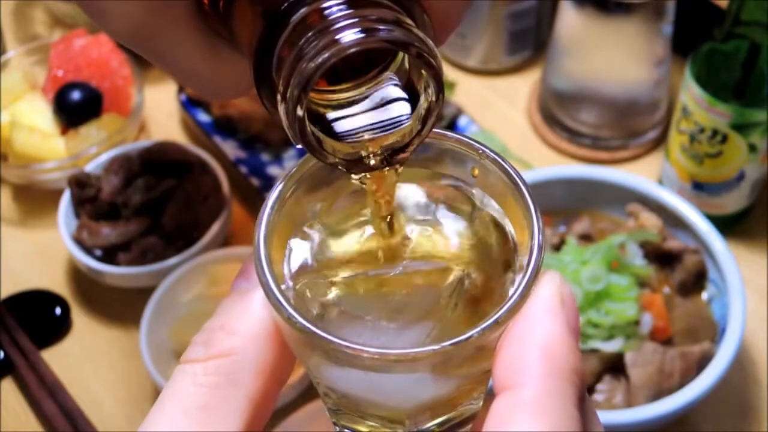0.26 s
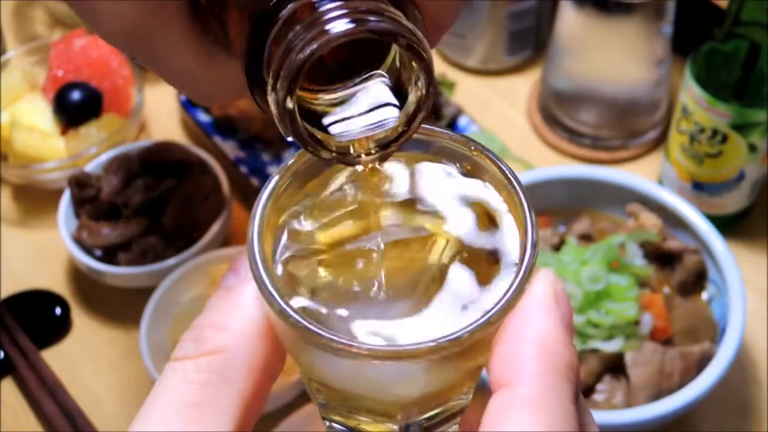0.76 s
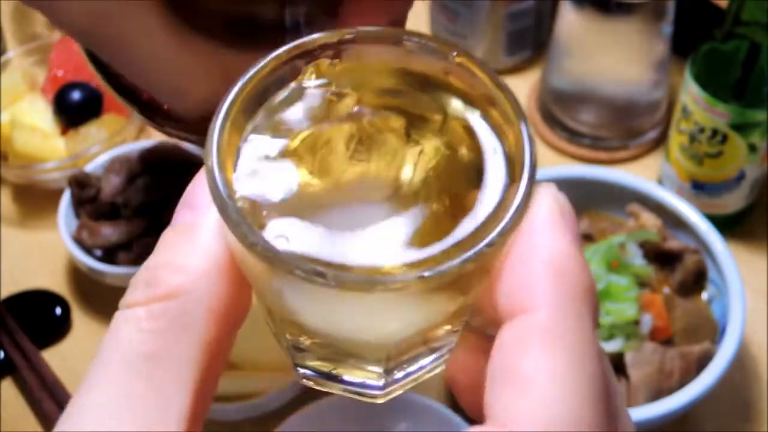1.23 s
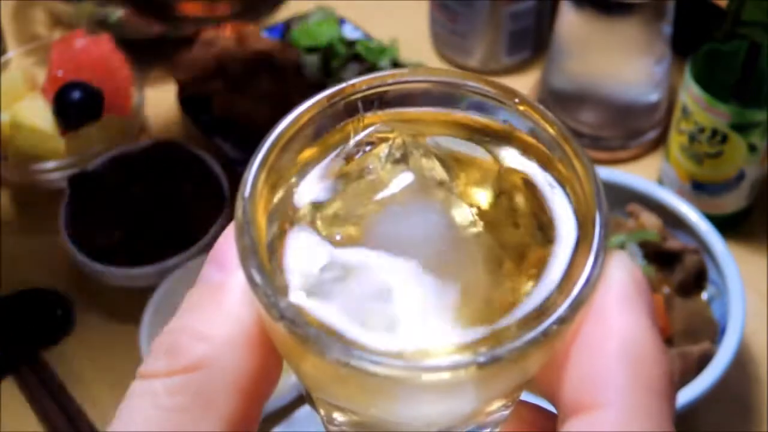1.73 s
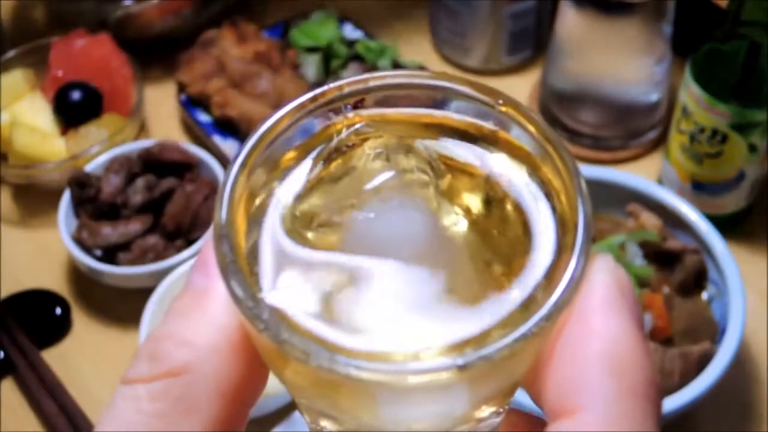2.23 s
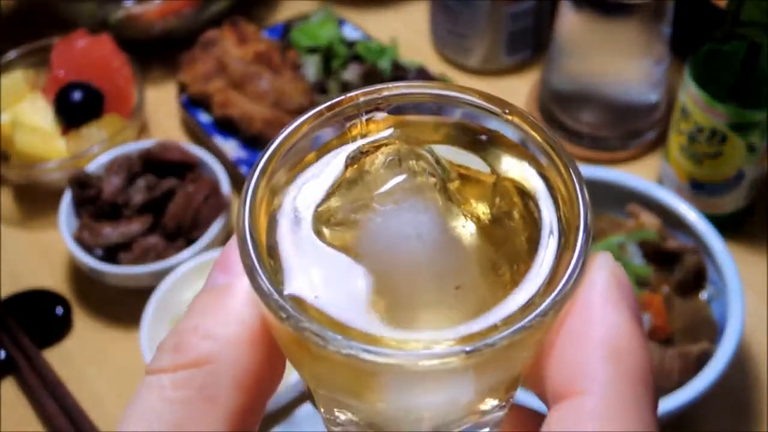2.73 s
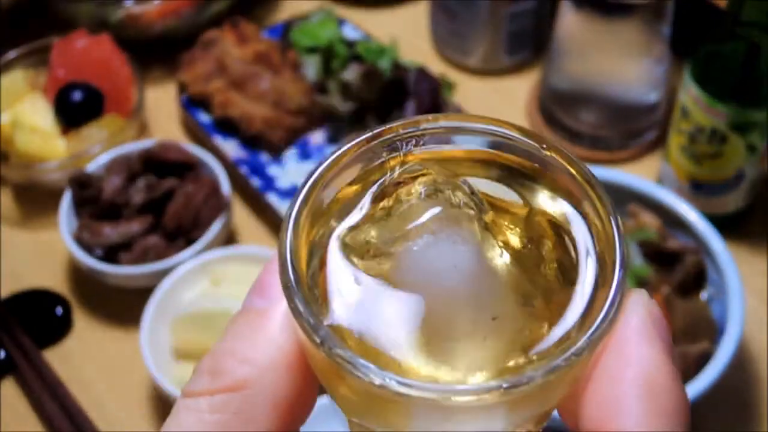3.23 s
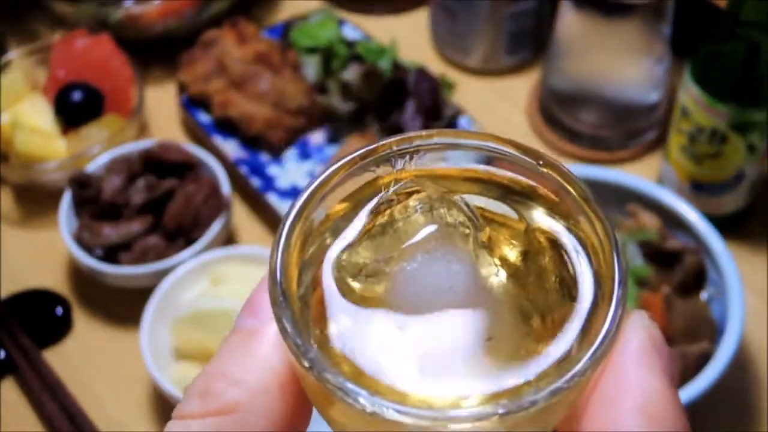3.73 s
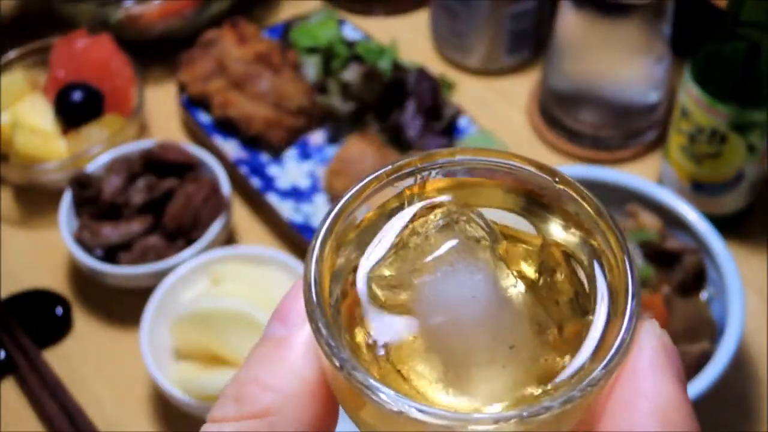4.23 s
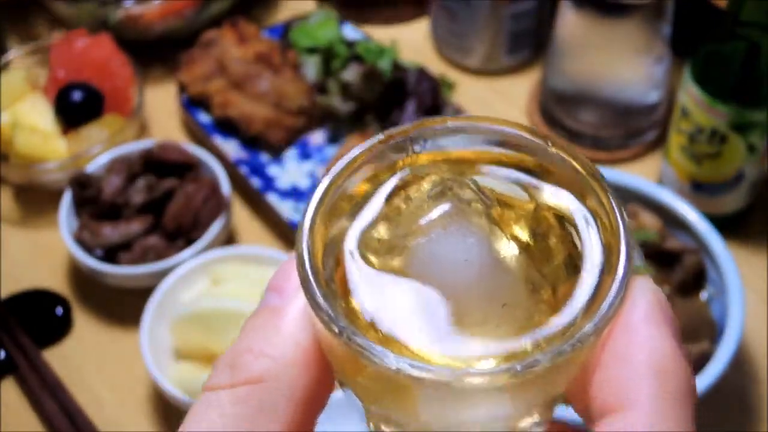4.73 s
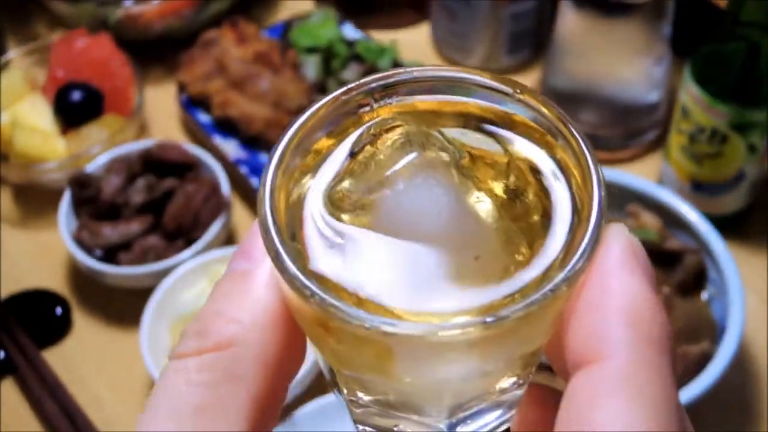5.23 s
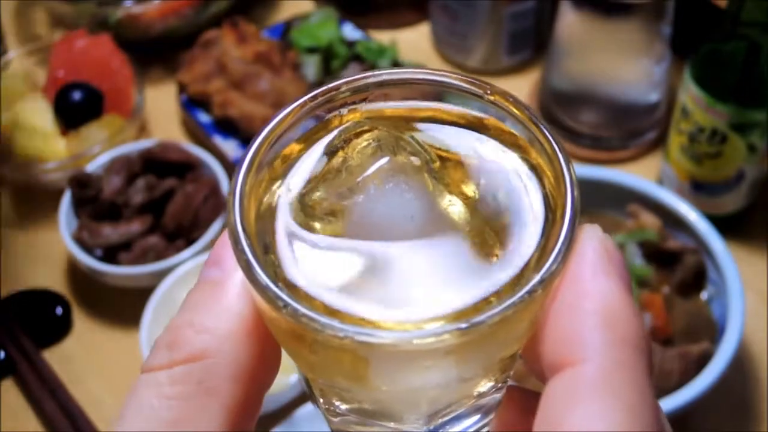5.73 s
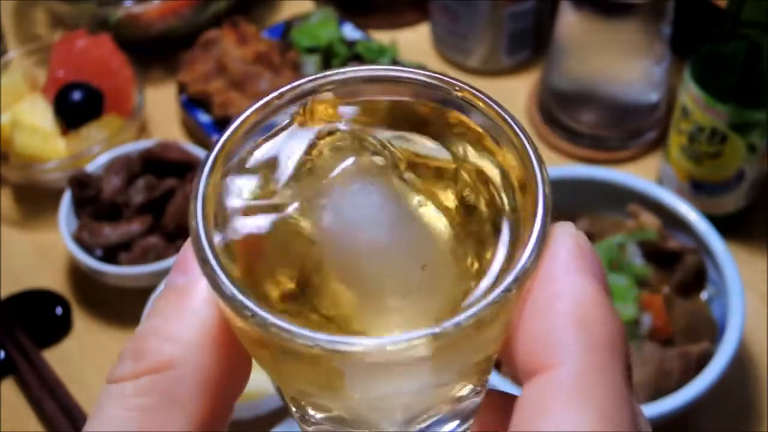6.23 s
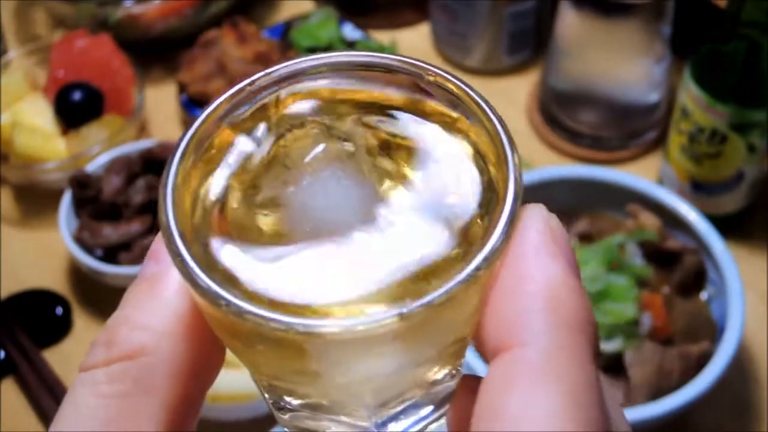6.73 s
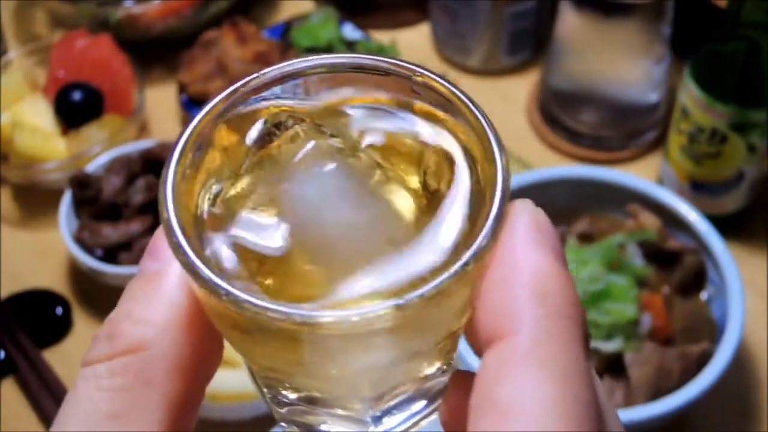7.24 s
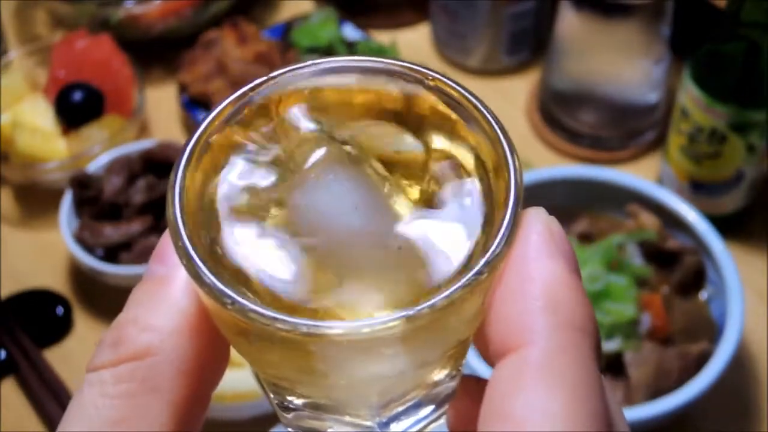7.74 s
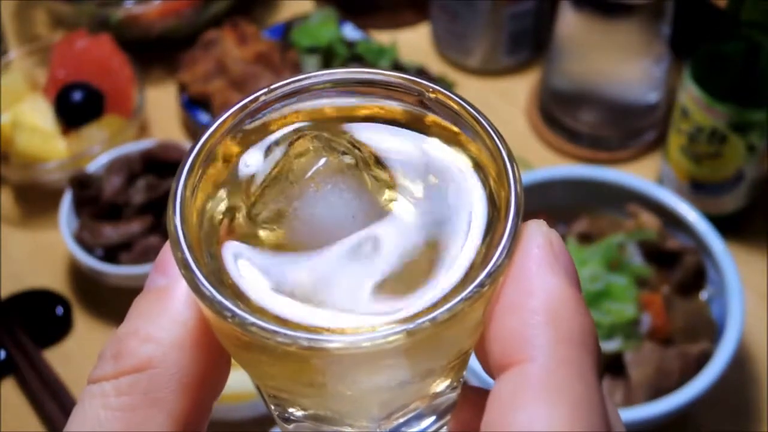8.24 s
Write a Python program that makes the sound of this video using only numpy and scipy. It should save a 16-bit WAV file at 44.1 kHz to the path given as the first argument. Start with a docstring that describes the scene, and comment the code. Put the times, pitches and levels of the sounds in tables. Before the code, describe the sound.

Hollow ringing glugs, a rapid burst of gulping pops, a loud bottle thump on wood, short scrapes and glassy chatter, then tiny ice clinks.

```python
"""Liquor poured over ice

A quiet room, a stereo microphone close to a small glass of ice: liquor glugs from a bottle neck as ringing air.
The bottle is tipped back and gulps air in short pops, amid small bubbles and a rising gurgle. It is set down on a
wooden table (clicks into modes), slid (friction grains) and rocked (bright bursts); ice ticks on the glass (high
rings). Behind it lie the hiss of air and preamplifier, swells of low rumble and the room's echoes."""
import sys
import numpy as np
from scipy import signal
from scipy.fft import rfft, irfft
from scipy.io import wavfile
from scipy.ndimage import uniform_filter1d, minimum_filter1d

SR = 44100
rng = np.random.default_rng(int(sys.argv[2]) if len(sys.argv) > 2 else 0)


def pcm_store(signal):
    """Save signal as 16-bit PCM."""
    levels = np.round(np.clip(np.atleast_2d(signal), -1, 1) * 32767)
    wavfile.write(sys.argv[1], SR, levels.astype(np.int16).T)


def undo_db(level):
    """Turn decibels back into plain size, where 20 dB means ten times bigger."""
    steps = np.asarray(level, float) / 20
    return 10 ** steps


N = 373527


def rms_one(x):
    """Scale to unit rms."""
    return x / np.sqrt(np.mean(x ** 2) + 1e-20)


def at_hz(points, hz):
    """Read a spectrum on a log-frequency axis."""
    point_hz, value = np.transpose(points)
    return np.interp(np.log(hz), np.log(point_hz), value)


def butter(x, order, hz, kind="low"):
    """Pass a sound through a Butterworth filter."""
    return signal.sosfilt(signal.butter(order, hz, kind, fs=SR, output="sos"), x)


def coloured(x, gain):
    """Filter by a gain given as a function of frequency."""
    hz = np.maximum(np.fft.rfftfreq(N, 1 / SR), 1)
    return irfft(rfft(x) * gain(hz), N)


def clicks(times, heights):
    """One sample of the given height at each time."""
    out = np.full(N, 1e-18)
    np.add.at(out, (np.asarray(times) * SR).astype(int), heights)
    return out


def ring(drive, hz, t60):
    """A two-pole resonance: a unit click sets a dying sine of height 1 ringing."""
    r = undo_db(-60 / (t60 * SR))
    w = 2 * np.pi * hz / SR
    return signal.lfilter([0, np.sin(w)], [1, -2 * r * np.cos(w), r * r], drive)


def bursts(times, levels_db, t60, noise=None):
    """Noise, white unless given, that starts at once and dies away."""
    out = np.zeros(N + SR)
    age = np.arange(SR // 3) / SR
    for s, db in zip(times, levels_db):
        add(out, s, undo_db(db - 60 * age / t60))
    return out[:N] * (rng.standard_normal(N) if noise is None else noise)


def swell(top_s, db, rise_db_per_s, fall_db_per_s):
    """Gain that climbs to a top and sinks again, straight in dB."""
    late = np.arange(N) / SR - top_s
    return undo_db(db + np.where(late < 0, rise_db_per_s, -fall_db_per_s) * late)


def add(out, s, wave):
    """Mix a wave in at a time."""
    start = int(s * SR)
    out[start:start + len(wave)] += wave


# air and preamplifier hiss: f/Hz, level/dB per Hz (relative)
ROOM_TONE = [(12, -5), (20, 1), (66, -6.5), (135, -6.5), (205, -9), (398, -10.5), (555, -13.5), (620, -12),
             (674, -12), (1270, -16.5), (1880, -20), (6530, -25), (10800, -26), (13800, -24.5),
             (15000, -50)]
# how alike the two microphone sides are: f/Hz, likeness (0 to 1)
LIKENESS = [(60, 0.77), (180, 0.4), (540, 0.4), (1620, 0.17), (4860, 0.048), (14600, -0.0)]


def room_tone():
    """Steady air and preamplifier hiss, alike on both sides only in the bass."""
    def colour(hz):
        return undo_db(at_hz(ROOM_TONE, hz))

    def alike(hz):
        return np.clip(at_hz(LIKENESS, hz), 0, .99)

    mid = coloured(rng.standard_normal(N), lambda hz: colour(hz) * np.sqrt(1 + alike(hz)))
    side = coloured(rng.standard_normal(N), lambda hz: colour(hz) * np.sqrt(1 - alike(hz)))
    mid_rms = np.sqrt(np.mean(mid ** 2))
    return undo_db(-52) * np.array([mid + side, mid - side]) / mid_rms


# low rumble carried through hand and table: top t/s, level/dB, rise/dB per s, fall/dB per s
RUMBLE = [(.136, -54, 77, 19), (.548, -54.5, 70, 140), (4.3, -58, 28, 15)]


def rumble():
    """Narrow low noise in swells."""
    level = np.max([swell(*row) for row in RUMBLE], axis=0)
    return level * rms_one(butter(rng.standard_normal(N), 2, [60, 130], "band"))


# the room's diffuse answer: f/Hz, level/dB, t60/s
ROOM = [(152, -15, 0.36), (380, -24, 0.16), (950, -17.5, 0.31), (2500, -27.5, 0.34), (6000, -24, 0.4),
        (11000, -48, 0.24)]


def room(x):
    """Dense echoes: noise dying at its own rate in each band, partly shared by both sides."""
    age = np.arange(SR // 3) / SR
    answer = 0
    for hz, db, t60 in ROOM:
        tail = butter(rng.standard_normal((3, len(age))), 1, [hz / 1.3, hz * 1.5], "band")
        tail = tail * undo_db(-60 * age / t60) * np.minimum(1, age / 0.018)
        # wider bands hold more energy
        answer = answer + undo_db(db) * tail * np.sqrt(3 * hz / 11000 / np.sum(tail ** 2))
    shared, own = answer[0], answer[1:]
    return signal.fftconvolve(x[None], shared + 0.16 * own, axes=1)[:, :N]


def breadth(x, db, hz):
    """A wide body sends its treble to the two microphones by different short paths."""
    paths = rng.standard_normal(200) * np.exp(-np.arange(200) / 60)
    side = signal.lfilter(paths / np.linalg.norm(paths), 1, x)
    return undo_db(db) * butter(side, 1, hz, "high") * [[1], [-1]]


# bands of the bottle wall: f/Hz, width/Hz, level/dB
BOTTLE = [(2386, 59, -0.5), (3250, 24, -3), (4170, 130, -9), (5270, 120, -10), (6400, 100, -3),
          (8750, 60, -23), (10200, 370, -10)]


def bottle_glass(drive):
    """The bottle wall lifts a few narrow bands out of what shakes it."""
    out = 0
    for hz, width, db in BOTTLE:
        r = np.exp(-np.pi * width / SR)
        poles = [1, -2 * r * np.cos(2 * np.pi * hz / SR), r * r]
        out = out + undo_db(db) * signal.lfilter([(1 - r * r) / 2, 0, (r * r - 1) / 2], poles, drive)
    return out


# glass singing under friction: t/s, length/s, f/Hz, level/dB
SQUEAKS = [(4.3, 0.6, 6400, -68), (4.531, 0.2, 3250, -64), (6.637, 0.071, 8750, -49)]


def squeaks():
    """Noise in one narrow band, swelling and fading."""
    out = np.zeros(N)
    for s, length, hz, db in SQUEAKS:
        tone = rms_one(ring(rng.standard_normal(SR), hz, 0.068))[-int(length * SR):]
        add(out, s, undo_db(db) * tone * np.sqrt(np.hanning(len(tone))))
    return out


# colour of the friction: f/Hz, level/dB per Hz (relative)
RUB_COLOUR = [(88, -33), (150, 9.5), (728, 2), (818, 6), (11200, 4.5), (14200, 9.5), (15000, -31)]
# bottle base rubbing over wood: full-strength t/s, level/dB, rise/dB per s, fall/dB per s, added lows/dB
STROKES = [(3.817, -35.5, 203, 900, 12), (3.775, -62, 300, 900, 2), (3.835, -53.5, 900, 92, 15.5),
           (4.308, -56, 1700, 27, 12.5), (4.74, -56, 161, 76, 11), (4.844, -57, 1502, 260, 9),
           (5.228, -47.5, 1500, 200, 9.5), (6.639, -35, 2500, 191, 2.5), (6.788, -47, 800, 167, 11.5)]


def rubbing():
    """Dense friction grains of uneven size; wood carries the lows, the bottle wall rings along."""
    grains = rng.standard_normal(N) * undo_db(3.5 * np.minimum(rng.exponential(1, N), 4))
    grains = rms_one(coloured(grains, lambda hz: undo_db(at_hz(RUB_COLOUR, hz))))
    low = butter(grains, 2, 2000)
    levels = [swell(*row[:-1]) for row in STROKES]
    level = sum(levels)
    low_level = sum(gain * undo_db(row[-1]) for gain, row in zip(levels, STROKES))
    wall = bottle_glass(level * undo_db(3) * grains)
    return level * (grains - low) + low_level * low + wall


# bottle glass chattering on the table: t/s, level/dB (relative)
CHATTER = [(3.899, -40), (3.962, -38), (4.3096, -34.5), (4.743, -33.5), (4.769, -37), (4.784, -33),
           (4.844, -25.5), (4.861, -32.5), (5.1714, -38), (5.2298, -26), (5.252, -27)]


def chatter():
    """Short bright bursts as the base rocks, with the bottle wall ringing along."""
    s, db = np.transpose(CHATTER)
    bright = butter(bursts(s, db - 9.5, t60=0.031), 2, 2200, "high")
    return bright + undo_db(13.0) * bottle_glass(bright)


# colour of dishes rattling on the table: f/Hz, level/dB per Hz (relative)
RATTLE = [(60, -3), (150, -0.5), (400, 2), (1000, -1), (2000, -13.5), (4000, -25), (8000, -34),
          (15000, -34)]


def knocks(rows, modes, share_db, crack_db, crack_t60, rattle_db, rattle_t60):
    """Each contact is a low-passed click into the modes, plus a short crack; dishes on the table rattle on."""
    s, db, bright_hz = np.transpose(rows)
    dishes = rms_one(coloured(rng.standard_normal(N), lambda hz: undo_db(at_hz(RATTLE, hz))))
    rattle = bursts(s + 0.001, db + rattle_db, rattle_t60, dishes)
    drive = 0
    for at_s, blow_db, hz in rows:
        r = np.exp(-2 * np.pi * hz / SR)
        click = clicks([at_s], undo_db(blow_db + share_db))
        drive = drive + signal.lfilter([(1 - r) ** 2], [1, -2 * r, r * r], click)
    # a harder, brighter contact cracks louder: 13 dB per octave
    crack = bursts(s, db + crack_db + 13 * np.log2(bright_hz / 1000), crack_t60)
    body = 0
    for k, (hz, level_db, t60) in enumerate(modes):
        # neighbouring bending shapes of the top radiate with opposite sign,
        # except the pair that carries the thump
        sign = 1 if 350 < hz < 660 else (-1) ** k
        body = body + sign * undo_db(level_db) * ring(drive, hz, t60)
    return signal.lfilter([1 - .6], [1, -.6], crack) + rattle + body


# bottle base on the table, tilted on its edge or set down flat: t/s, level/dB (relative), brightness f/Hz
LIGHT_KNOCKS = [(3.239, -30, 500), (3.2415, -13, 840), (3.495, -50, 900), (3.7165, -9.5, 580),
                (4.308, -43, 1300), (5.318, -28, 250), (6.41, -40, 300), (6.612, -56, 1500)]
HEAVY_KNOCKS = [(3.5352, 11, 790), (3.5379, 6, 3120), (3.5442, 3, 910), (3.782, -8.5, 2500),
                (3.788, -15, 1500), (3.794, -6, 1970), (3.802, -6, 1160)]
# what the light and the heavy contacts set ringing: f/Hz, level/dB, t60/s
EDGE_MODES = [(143, -10, 0.13), (200, -17, 0.23), (300, -7.5, 0.05), (500, 0, 0.014), (624, 0.0, 0.072),
              (1070, -17.5, 0.13), (1550, -30, .05), (2840, -10.5, 0.24), (4330, -30, .06)]
TABLE_MODES = [(130, -7, 0.057), (186, -15.5, 0.17), (320, -16.5, 0.13), (387, -1.5, 0.1),
               (526, 1.5, 0.046), (700, -4, 0.048), (805, -6, 0.035), (955, -4, 0.061), (1275, -4, 0.023),
               (1650, 0.5, 0.031), (1963, -5.5, 0.037), (2374, -3.5, 0.03), (2780, -5.5, 0.0235),
               (4000, -5, 0.028)]


def table():
    """Light and heavy contacts, each driving its own set of modes."""
    light = knocks(LIGHT_KNOCKS, EDGE_MODES, share_db=-2.5, crack_db=-14, crack_t60=0.077,
                   rattle_db=-25.0, rattle_t60=0.22)
    heavy = knocks(HEAVY_KNOCKS, TABLE_MODES, share_db=-5.5, crack_db=-28.0, crack_t60=0.046,
                   rattle_db=-24.5, rattle_t60=0.2)
    return light + heavy


# ice touching the wall of the glass: t/s, level/dB (relative), edge level/dB added to it
ICE = [(6.4118, -37.5, -4), (6.4931, -27.5, -6), (6.5124, -39, -7), (7.0594, -46, -5), (7.1162, -46, -1),
       (7.2838, -38, -9), (7.327, -43.5, 4.5), (7.42, -49, 8), (7.447, -46, -2), (7.5173, -31, -3.5),
       (7.5336, -33, -13), (7.5444, -42, -8), (7.667, -40, -4), (7.7375, -25, -15), (7.75, -37, -12),
       (7.9447, -35, -17), (7.965, -30, -10), (8.1673, -42, -6)]
# ring of the full glass: f/Hz, level/dB (relative), t60/s
GLASS = [(6880, -1.5, 0.025), (6700, -23, 0.018), (7570, -12, 0.0092), (13700, -12, .015)]


def ice():
    """A sharp edge and the short high ring of the full glass."""
    # while the glass is swirled the ice also ticks faintly at random
    swirl_from_s, swirl_to_s = 6.5, 8.3
    faint = [(swirl_from_s + (swirl_to_s - swirl_from_s) * when, -51 - 5 * soft, -5)
             for when, soft in rng.random((8, 2))]
    s, db, edge_db = np.transpose(list(ICE) + faint)
    # every touch excites the rings unevenly
    strength = undo_db(2.5 * rng.standard_normal((len(s), len(GLASS))))
    rings = 0
    for k, (hz, level_db, t60) in enumerate(GLASS):
        rings = rings + ring(clicks(s, undo_db(db + level_db - 6.5) * strength[:, k]), hz, t60)
    edges = bursts(s, db + edge_db, t60=.008)
    return rings + butter(edges, 2, 5500, "high")


def air_ring(db, hz, t60, swell_s):
    """Trapped air swells quickly and rings out on one pitch."""
    age = np.arange(int(t60 * SR)) / SR
    onset = (1 - np.exp(-age / swell_s)) ** 2
    return -onset * undo_db(db - 60 * age / t60) * np.sin(2 * np.pi * hz * age)


def gliding(pitch_hz, level_db):
    """A tone on a moving pitch with soft ends."""
    part = np.linspace(0, 1, len(pitch_hz))
    ends = np.minimum(1, 12 * np.minimum(part, 1 - part))
    return ends * undo_db(level_db) * np.sin(2 * np.pi * np.cumsum(pitch_hz) / SR)


def pocket(length, hz, rise, db, fade_db, bend):
    """A shrinking pocket of air climbs in pitch and fades; bend above 1 makes it climb ever faster."""
    part = np.linspace(0, 1, int(length * SR))
    return gliding(hz * rise ** (part ** bend), db - fade_db * part)


# small bubbles and droplets ringing, most of them around the gulps: t/s, level/dB, f/Hz, t60/s
BUBBLES = [(1.198, -48, 1590, 0.076), (1.2202, -36, 200, 0.019), (1.222, -21.5, 310, .025),
           (1.232, -37, 440, 0.068), (1.223, -23.5, 2520, 0.01), (1.2223, -15.5, 1298, 0.054),
           (1.226, -32, 960, .07), (1.318, -43, 9050, 0.037), (1.3187, -13.5, 666, 0.031),
           (1.321, -31.5, 1050, .09), (1.385, -27, 3640, 0.016), (1.385, -28, 5600, 0.014),
           (1.385, -34.5, 8340, 0.015), (1.387, -20.5, 935, .1), (1.387, -51, 2000, 0.11),
           (1.457, -35.5, 912, 0.15), (1.459, -38, 380, 0.095), (1.461, -39, 1920, 0.18),
           (1.578, -41, 895, 0.12), (1.619, -37, 4600, 0.014), (1.619, -43, 3600, .022),
           (1.62, -42.5, 11000, .038), (2.095, -40.5, 2090, .016), (4.396, -37, 4540, 0.019)]
# tiny pockets that chirp upward as they burst: t/s, first f/Hz, level/dB
CHIRPS = [(1.225, 2720, -35.5), (1.2225, 7300, -36), (1.2225, 9400, -33.5)]


def bubbles():
    """Small pockets of air: some ring on one pitch, some chirp upward."""
    out = np.zeros(N)
    for s, db, hz, t60 in BUBBLES:
        add(out, s, air_ring(db, hz, t60, swell_s=0.01 * t60))
    for s, hz, db in CHIRPS:
        add(out, s, pocket(0.0088, hz, rise=1.35, db=db, fade_db=9.5, bend=0.85))
    return out


# the last pocket in the neck: t/s, f/Hz, level/dB
GURGLE = [(1.388, 289, -39), (1.42, 320, -47), (1.44, 436, -45.5), (1.454, 700, -26.5), (1.459, 1550, -31),
          (1.466, 2280, -40), (1.478, 3530, -46)]


def gurgle():
    """The last pocket gurgles up the neck ever faster, one tone gliding upward."""
    out = np.zeros(N)
    s, hz, db = np.transpose(GURGLE)
    now = np.arange(s[0], s[-1], 1 / SR)
    pitch_hz = np.exp(np.interp(now, s, np.log(hz)))
    add(out, s[0], gliding(pitch_hz, np.interp(now, s, db)))
    return out


# big gulps of air as the bottle is tipped back: t/s, level/dB, f/Hz
GULPS = [(1.2212, -4.5, 724), (1.3189, -11, 950), (1.3847, -8, 857), (1.4565, -19.5, 730)]


def gulps():
    """Air pops into the bottle, each gulp a short ring of trapped air."""
    out = np.zeros(N)
    for s, db, hz in GULPS:
        add(out, s, air_ring(db, hz, t60=0.011, swell_s=0.00047))
    return out


# glugs passing the neck: t/s, level/dB, climb/s
GLUGS = [(.1024, -22.5, .027), (0.3141, -25, .0225), (0.5357, -25, .007), (.79, -48.5, .007)]


def glugs():
    """A glug rings the neck; its pocket shrinks, climbs to near the neck's pitch and rings it again."""
    out = np.zeros(N)
    neck_swell_s, climb_from_hz, climb_to_hz = 0.00031, 600, 1150
    for s, db, climb_s in GLUGS:
        add(out, s, air_ring(db, 1205, t60=0.069, swell_s=neck_swell_s))
        add(out, s, air_ring(db - 19.5, 3600, t60=0.015, swell_s=neck_swell_s))   # overtone
        add(out, s, pocket(climb_s, climb_from_hz, climb_to_hz / climb_from_hz, db - 18,
                           fade_db=2.5, bend=2.4))
        # the longer the climb, the stronger the second ring: 400 dB per s
        again_db = db - 14.5 + 400 * climb_s
        add(out, s + climb_s, air_ring(again_db, 1167, t60=0.066, swell_s=0.0014))
    return out


# drops pricking the surface: t/s, level/dB
DRIPS = [(1.62, -38), (1.6771, -46), (1.694, -42)]


def film_snaps():
    """Bright noise bursts: the liquid film snaps as a pocket breaks free, and drops prick the surface."""
    glug_snaps = [(s, db - 15.5) for s, db, _ in GLUGS]
    gulp_snaps = [(s + 0.00091, db - 27.5) for s, db, _ in GULPS]
    s, db = np.transpose(glug_snaps + gulp_snaps + list(DRIPS))
    return butter(bursts(s, db, t60=0.011), 1, 2500, "high")


def scene():
    """Close sources, slightly left, with their echoes, the rumble and the room tone."""
    liquor = bubbles() + gurgle() + gulps() + glugs() + film_snaps()
    close = squeaks() + rubbing() + chatter() + table() + ice() + liquor
    heard = close * undo_db(np.array([[.4], [-.4]])) + breadth(close, db=-5.5, hz=7340) + room(close)
    heard = butter(heard, 3, 78.5, "high")   # close blows lose their deepest push
    return heard + rumble() + room_tone() * undo_db(np.array([[.15], [-.15]]))


def band_limit(x):
    """A steep low-pass at the top of the band."""
    return signal.sosfilt(signal.butter(12, 15180, fs=SR, output="sos"), x)


def record(dry):
    """The top is cut; a look-ahead limiter ducks before loud blows and recovers slowly; peaks still clip."""
    limit_db, ahead_s, release_db_per_s = 2.5, .008, 16
    dry = signal.sosfilt(signal.cheby2(8, 40, 14950, fs=SR, output="sos"), dry)
    peak_db = 20 * np.log10(np.abs(dry).max(axis=0) + 1e-9)
    over_db = np.maximum(peak_db - limit_db, 0)
    slope = release_db_per_s * np.arange(N) / SR
    held_db = np.maximum.accumulate(over_db + slope) - slope
    ahead = int(ahead_s * SR)
    held_db = -minimum_filter1d(-held_db, size=2 * ahead + 1)   # a running maximum sees the blow coming
    duck_db = uniform_filter1d(held_db, size=ahead // 2)
    mix = np.clip(dry * undo_db(-duck_db), -1, 1)
    return band_limit(mix)


dry = scene()
out = record(dry)
pcm_store(out)
```